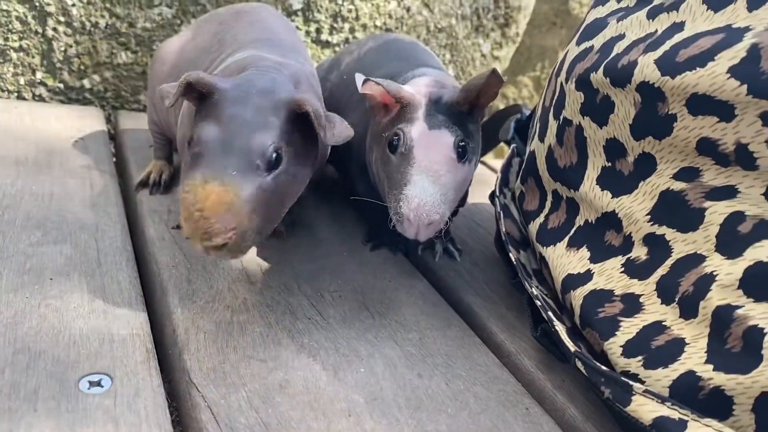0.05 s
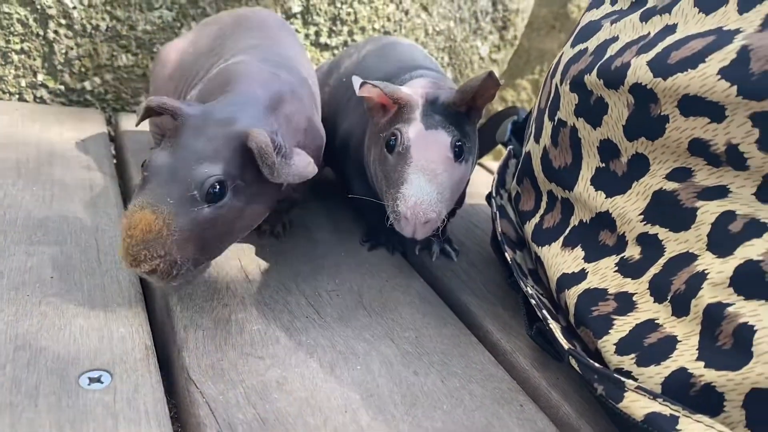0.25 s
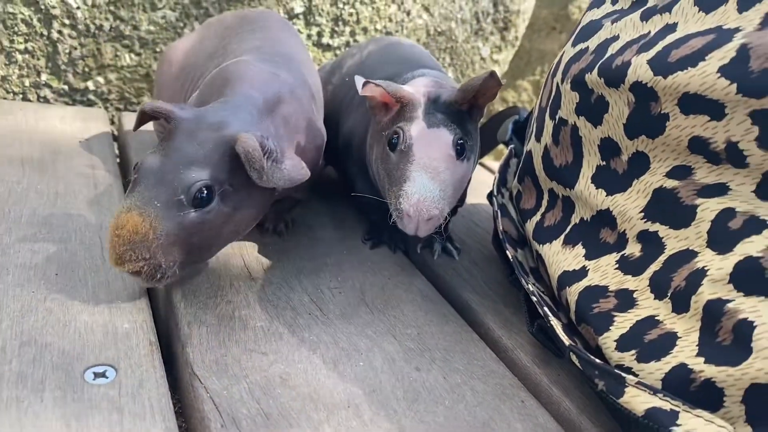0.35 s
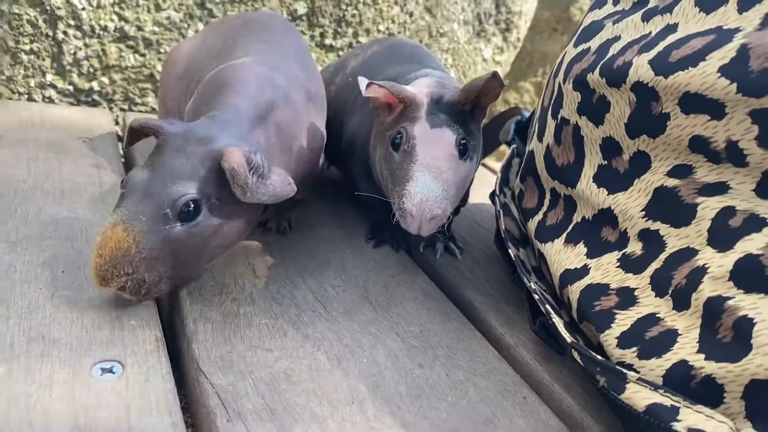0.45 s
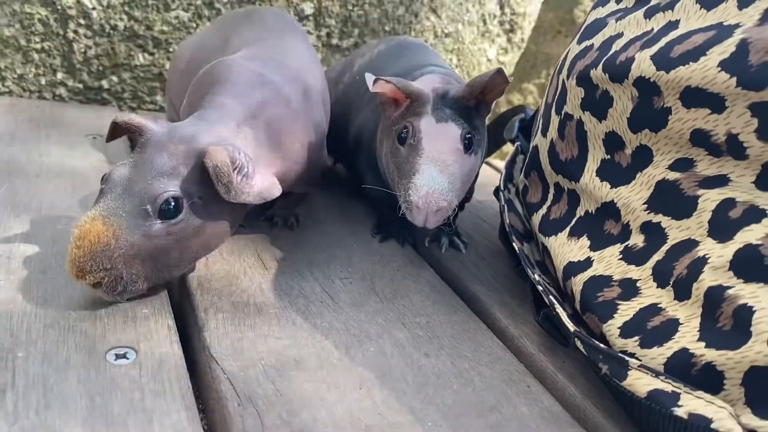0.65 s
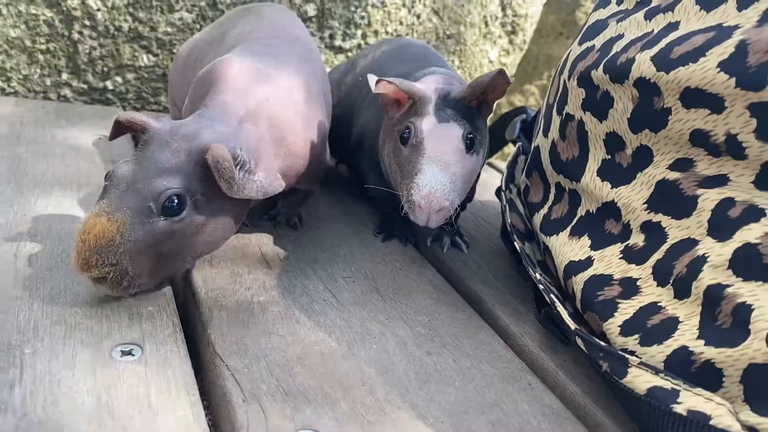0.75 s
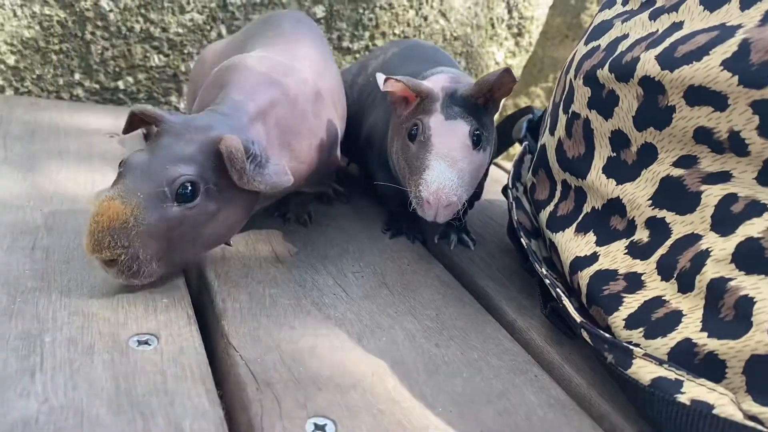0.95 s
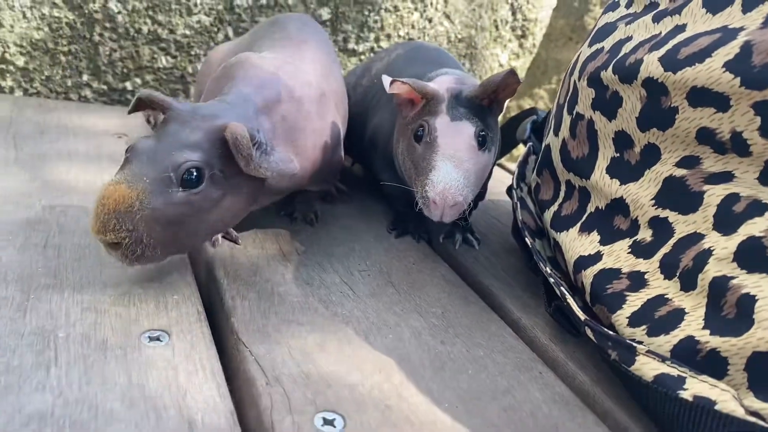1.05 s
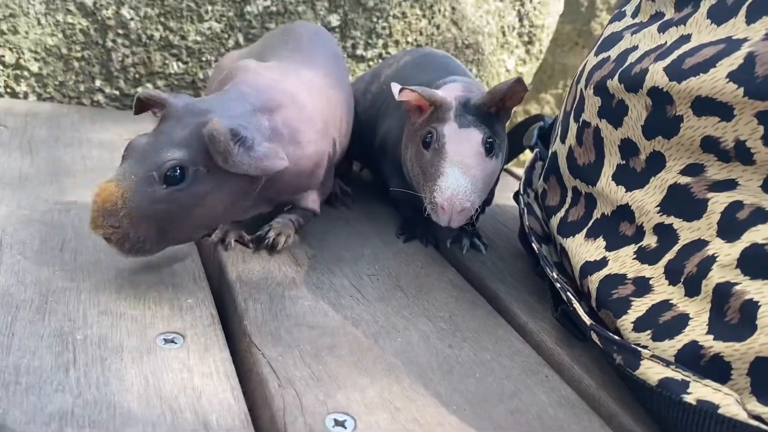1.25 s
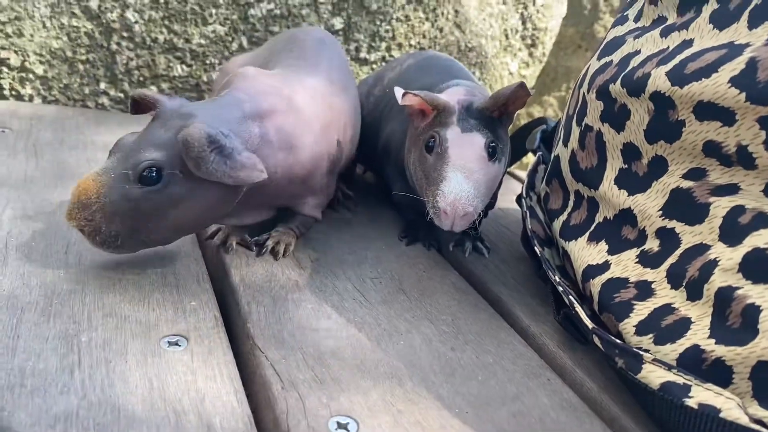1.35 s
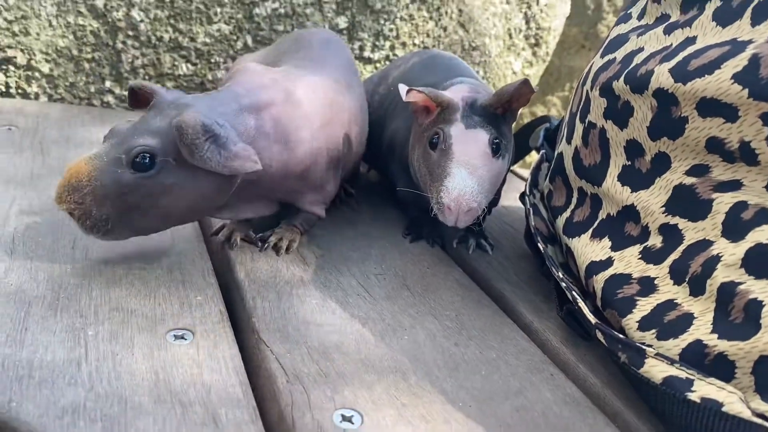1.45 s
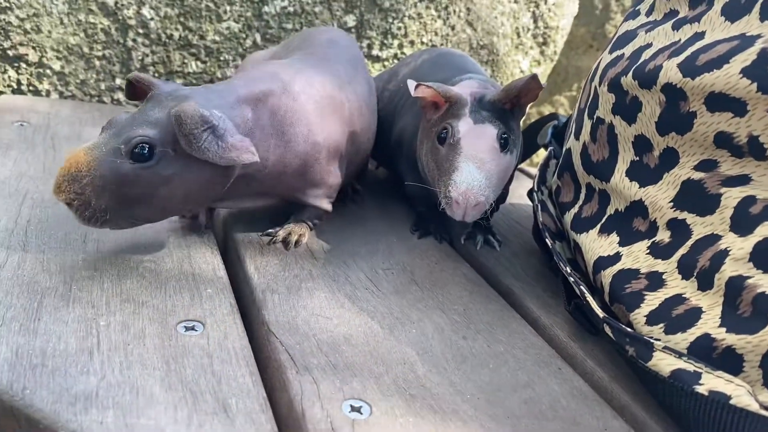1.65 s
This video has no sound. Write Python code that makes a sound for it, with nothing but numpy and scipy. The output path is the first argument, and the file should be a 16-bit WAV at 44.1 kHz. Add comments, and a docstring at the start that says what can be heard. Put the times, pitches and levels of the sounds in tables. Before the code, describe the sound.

A guinea pig whines in short, warbling squeaks, with wind rumbling on the microphone.

```python
"""A guinea pig whines close by: short, warbling squeaks that turn hoarse just before the pitch leaps up.
Its vocal folds buzz, its throat shapes the buzz, and the wooden deck adds a very short echo.
Two gusts of wind rumble and thump on the microphone of a hand-held phone.
A few tiny ticks, soft rustles and a thin high ring sit on a quiet outdoor hiss."""
import sys
import numpy as np
from scipy import signal
from scipy.fft import rfft, irfft
from scipy.io import wavfile
from scipy.ndimage import uniform_filter1d

SR = 44100
rng = np.random.default_rng(int(sys.argv[2]) if len(sys.argv) > 2 else 0)


def digitize_waveform(pressure):
    """Quantize a signal to 16-bit integers and store it at the path in sys.argv[1].

    Rows of a 2-D input are taken as channels; values are limited to [-1, 1].
    """
    field = np.atleast_2d(pressure).T
    bounded = np.clip(field, -1, 1)
    quanta = np.round(bounded * 32767).astype(np.int16)
    wavfile.write(sys.argv[1], SR, quanta)


N = 74970


def guinea_pig():
    """Vocal folds buzz through the throat; when hoarse, their swings alternate strong and weak."""
    # the path of the voice, one list for each whine: (time [s], pitch [Hz], level [dB])
    whines = [
        [(0.015, 488, -51.5), (0.035, 542, -52), (0.053, 549.6, -56), (0.063, 826, -49), (0.071, 1136, -56)],
        [(0.109, 547, -51), (0.12, 602, -46), (0.138, 496.4, -48.5), (0.147, 741, -48), (0.153, 749, -54)],
        [(0.159, 593, -52), (0.165, 726, -41), (0.174, 682, -45), (0.185, 756, -40), (0.194, 609, -44),
         (0.206, 740, -46), (0.211, 1077, -37), (0.217, 1202, -35.5), (0.223, 1056, -43.5), (0.227, 745, -71)],
        [(0.258, 560.4, -49), (0.266, 705, -40.5), (0.279, 684.5, -47.5), (0.292, 1135, -42.5), (0.3, 946, -42),
         (0.313, 789.7, -41.5), (0.321, 547, -45), (0.329, 680, -48), (0.338, 1113, -52)],
        [(0.522, 599.8, -50), (0.528, 726.7, -43), (0.549, 620, -42), (0.558, 1048, -41.5), (0.565, 1132, -45),
         (0.571, 945, -45.5), (0.578, 1129, -36.5), (0.583, 1032, -44), (0.587, 709, -65)],
        [(0.618, 580, -51), (0.626, 740.6, -41.5), (0.636, 721, -45), (0.644, 1109, -45.5),
         (0.651, 1114, -39.5), (0.661, 762.6, -50), (0.668, 650, -44.5), (0.678, 734.8, -43), (0.686, 620, -57)],
        [(0.72, 577, -59), (0.732, 701, -47), (0.74, 684, -50.5), (0.75, 568.4, -49.5), (0.76, 788, -43),
         (0.768, 1208, -61)],
        [(0.817, 514.5, -53.5), (0.825, 503.5, -50.5), (0.833, 437, -56)],
        [(0.909, 737, -46), (0.93, 700, -42), (0.942, 531.8, -44), (0.952, 612, -43), (0.959, 1118, -38),
         (0.965, 1266, -38.5), (0.97, 1102, -43.5), (0.974, 707, -55), (0.983, 578, -44), (0.997, 777.4, -39.5),
         (1.009, 902, -45), (1.024, 790, -40.5), (1.032, 771, -41.5), (1.037, 1149, -41.5), (1.043, 1255, -36),
         (1.052, 819, -43), (1.061, 592.3, -40.5), (1.078, 535.2, -46), (1.09, 596, -39.5), (1.101, 907, -41.5),
         (1.112, 1175, -38.5), (1.122, 783, -41), (1.134, 701, -40), (1.142, 748.6, -41.5), (1.16, 580, -42.5),
         (1.18, 452.5, -51.5), (1.195, 476.2, -45), (1.207, 673.5, -44.5), (1.222, 549, -57),
         (1.238, 800, -53.5)],
        [(1.289, 490, -54), (1.303, 553, -53), (1.322, 442.4, -51.5), (1.332, 589, -53.5)],
        [(1.391, 640, -50), (1.4, 732.3, -41.5), (1.414, 731, -41.5), (1.427, 539, -43), (1.439, 618.6, -44.5),
         (1.446, 1103, -38.5), (1.452, 1299, -38), (1.458, 1080, -49), (1.465, 760.4, -47), (1.476, 594.5, -43),
         (1.488, 547, -42), (1.497, 603, -42.5), (1.507, 814.6, -39), (1.521, 1019, -44.5),
         (1.529, 856.7, -41.5), (1.536, 893.6, -40.5), (1.545, 560.5, -49)],
        [(1.567, 514, -49), (1.577, 637, -44), (1.588, 829, -42.5), (1.598, 1116, -40), (1.609, 782, -48.5),
         (1.622, 872, -41), (1.631, 758.6, -44), (1.638, 501, -52)],
    ]
    # hoarse stretches, where the folds swing unevenly: (start [s], end [s], roughness [0-1])
    hoarse = [(0.197, .209, 0.93), (.27, .3, 0.72), (0.302, .32, 0.13), (0.534, .573, 0.69),
              (0.632, .642, 0.63), (.66, .673, 0.46), (.752, 0.762, 0.29), (0.936, .957, 0.74),
              (1.002, 1.02, 0.76), (1.019, 1.036, 0.22), (1.421, 1.444, 0.59), (1.511, 1.533, 0.72),
              (1.589, 1.622, .35)]
    # how throat and mouth boost or weaken the buzz: (frequency [Hz], gain [dB])
    throat = [(250, -16), (480, -2), (720, 1), (1130, 1.5), (1480, -3), (1700, -8.5), (1850, -15),
              (2080, -25.5), (2260, -10), (2520, -4.5), (2780, -11.5), (2950, -26), (3450, -26),
              (5000, -50)]
    attack_s, release_s, glide_s = 0.0044, 0.0021, 0.0014
    full_voice_db = -40.5
    t = times()
    when, pitch, db = np.array([row for whine in whines for row in whine]).T
    hz = uniform_filter1d(np.interp(t, when, pitch), int(glide_s * SR))
    level_db = np.interp(t, when, db)
    sounding = sum(gate(whine[0][0], whine[-1][0], attack_s, release_s) for whine in whines)
    rough = 0.13 + sum(amount * gate(start, end, attack_s, attack_s) for start, end, amount in hoarse)
    pitch_wobble = (0.01421 + 0.09 * rough) * band_noise(0, 399)
    phase = 2 * np.pi * np.cumsum(hz * (1 + pitch_wobble)) / SR
    # below full voice the overtones fall away faster, so soft whines sound duller
    db_per_octave = -1.5 + 0.43 * np.minimum(level_db - full_voice_db, 0)
    buzz = sum(undb(db_per_octave * np.log2(k)) * np.cos(k * phase) for k in range(1, 9))
    uneven_swing = 0.83 * rough * np.cos(phase / 2 + band_noise(0, 100))  # at half the pitch
    rasp = (0.048 + 0.46 * rough) * band_noise(0, 880)
    voice = colour(buzz * (1 + uneven_swing + rasp), throat)
    # even out the loudness, then give each whine its own rise and fall
    loudness = np.sqrt(uniform_filter1d(voice ** 2, size=330) + 1e-9)
    return voice / loudness * undb(level_db + 1) * sounding


def on_deck(voice):
    """The voice reaches the left and right microphones differently; boards and wall add a short echo."""
    # how much louder the left side is: (frequency [Hz], left minus right [dB])
    balance = [(700, 1), (1200, -0.2), (1600, -0.5), (2400, -4.5), (4000, 1)]
    # how far the wave on the left runs ahead: (frequency [Hz], lead [radians])
    left_lead = [(700, 0.59), (1300, 0.63), (1700, 0.81), (2300, 1.72), (2800, 1.86), (3200, 1.76)]
    echo_db, echo_s = -16, 0.06  # the echo dies away by 60 dB in echo_s
    to_left = undb(on_log(freqs(), balance) / 2) * np.exp(0.5j * on_log(freqs(), left_lead))
    direct = irfft(rfft(voice) * np.array([to_left, 1 / to_left]), N)
    scatter = rng.standard_normal((2, N)) * undb(-60 * times() / echo_s)
    scatter /= np.sqrt(np.sum(scatter ** 2, axis=1, keepdims=True))
    echo = signal.fftconvolve(voice[None], scatter, axes=1)[:, :N]
    return direct + undb(echo_db) * echo


def wind():
    """Swirling air hits the microphone: a deep rumble, quicker buffeting above it and a few thumps."""
    # how the gusts rise and fall: (time [s], rumble level [dB], buffeting level [dB])
    gusts = [(0.0, -60, -77), (0.028, -51.5, -54), (0.17, -58, -62), (0.216, -43.5, -48.5),
             (0.264, -54, -54), (0.35, -45.5, -44.5), (0.382, -35, -54.5), (0.43, -43.5, -41),
             (0.52, -39, -23), (0.59, -29, -34.5), (0.614, -26, -24.5), (0.634, -42, -29),
             (0.652, -29, -39.5), (0.696, -41, -32), (0.738, -31.5, -43), (0.766, -45.5, -57),
             (0.832, -47.5, -56), (0.95, -37, -38.5), (0.994, -35.5, -51), (1.026, -50, -42),
             (1.084, -44.5, -63.5), (1.14, -42.5, -53), (1.182, -57.5, -60), (1.458, -56, -55),
             (1.52, -65, -52.5), (1.7, -61, -60.5)]
    # the tone of the wind: (frequency [Hz], gain [dB])
    wind_tone = [(20, -37), (35, -18), (60, -3.5), (120, -4.5), (230, -5.5), (350, -14.5), (550, -28),
                 (1000, -49.5), (3000, -81)]
    # single swirls that thump the microphone: (time [s], pitch [Hz], peak level [dB])
    swirls = [(0.385, 104.2, -30), (.458, 286.5, -29), (.472, 99.5, -26.5), (.495, 426, -29.5),
              (0.51, 230, -19.5), (.528, 149.7, -21), (.538, 398.4, -28), (.549, 94.8, -23),
              (0.614, 283, -28.5), (.638, 75, -22.5), (0.727, 165.2, -26.5), (.898, 104.3, -31.5),
              (0.952, 92.8, -32.5), (1.019, 121, -34)]
    rumble_top_hz, low_cut_hz, thump_cycles = 101.2, 38, 0.53
    t, f = times(), freqs()
    when, rumble_db, buffet_db = np.array(gusts).T
    shared, side = (unit(colour(rng.standard_normal(N), wind_tone)) for _ in range(2))
    flow = shared + undb(-6.5) * side * np.array([[1], [-1]])  # left and right differ a little
    deep = irfft(rfft(flow) / (1 + (f / rumble_top_hz) ** 6), N)
    rumble = unit(deep) * undb(np.interp(t, when, rumble_db) - 1)
    buffet = unit(flow - deep) * undb(np.interp(t, when, buffet_db) - 2)
    thumps = np.zeros(N)
    for at, hz, db in swirls:
        cycles = (t - at) * hz
        thumps += undb(db) * np.exp(-(cycles / thump_cycles) ** 2) * np.cos(2 * np.pi * cycles)
    return irfft(rfft(rumble + buffet + thumps) / np.sqrt(1 + (low_cut_hz / (f + 1)) ** 6), N)


def ticks():
    """Tiny dry ticks, likely claws on the boards: bursts of noise that die away at once."""
    # the taps: (time [s], peak level [dB])
    taps = [(.566, -51), (.835, -44), (1.198, -48)]
    # the tone of a tick: (frequency [Hz], gain [dB])
    tick_tone = [(1000, -8), (3000, -9), (5000, -7), (7500, 0), (11000, -2), (13500, -6), (15500, 1)]
    decay_s = 0.003
    t = times()
    bursts = sum(undb(db) * (t >= at) * np.exp(-np.abs(t - at) / decay_s) for at, db in taps)
    return bursts * unit(colour(rng.standard_normal(N), tick_tone))


def rustles():
    """Soft puffs of high noise that swell and fade."""
    # the puffs: (middle [s], half-length [s], level [dB], frequency [Hz], width [Hz])
    puffs = [(.617, 0.0045, -58, 4440, 1500), (1.231, .018, -60, 8146, 2511),
             (1.229, .018, -62, 15400, 1204), (1.253, 0.016, -63.5, 3256, 394),
             (1.644, 0.03, -58, 5157, 3470)]
    return sum(undb(db) * np.exp(-((times() - at) / half) ** 2) * band_noise(hz, width)
               for at, half, db, hz, width in puffs)


def high_ring():
    """Three narrow bands of noise make a faint, thin ring near the end."""
    # the notes of the ring: (frequency [Hz], level [dB])
    notes = [(8320, -67), (10020, -71), (15000, -73)]
    ring = sum(undb(db) * band_noise(hz, width_hz=160) for hz, db in notes)
    return ring * gate(start=1.58, end=1.65, attack=0.03, release=0.03)


def outdoor_hiss():
    """A smooth hiss, partly shared by both microphones; its treble dips a little and comes back."""
    # the tone of the hiss: (frequency [Hz], gain [dB])
    hiss_tone = [(30, 4), (70, 2), (200, 1.5), (450, -8.5), (1000, -11.5), (2000, -18), (3100, -16.5),
                 (4000, -19), (5200, -20.5), (7000, -20), (10000, -24.5), (13000, -31), (15500, -25)]
    # how alike left and right are: (frequency [Hz], likeness [0-1])
    likeness = [(100, .85), (1000, .7), (2000, .3), (4000, .15), (7600, .2), (8300, .7), (15000, .85)]
    # how the treble drifts: (time [s], gain [dB])
    treble_drift = [(0, 3), (.3, 3), (.42, 0.5), (.8, 1), (1.4, 0), (1.7, 3)]
    treble_from_hz, delay_from_hz, treble_delay_s = 3300, 2670, 0.000177
    f = freqs()
    alike = on_log(f, likeness)
    shared = rfft(colour(rng.standard_normal(N), hiss_tone)) * np.sqrt(1 + alike)
    side = rfft(colour(rng.standard_normal(N), hiss_tone)) * np.sqrt(1 - alike)
    # the treble reaches the left side slightly later; the bass stays in step
    delay = treble_delay_s / (1 + (delay_from_hz / (f + 1)) ** 6)
    left = (shared + side) * np.exp(-2j * np.pi * f * delay)
    right = shared - side
    hiss = unit(irfft(np.array([left, right]), N)) * undb(-54)
    low = irfft(rfft(hiss) / (1 + (f / treble_from_hz) ** 4), N)
    treble_db = np.interp(times(), *np.array(treble_drift).T)
    return low + (hiss - low) * undb(treble_db)


def undb(db):
    """Turn decibels into a number to multiply by."""
    return 10 ** (np.asarray(db) / 20)


def unit(x):
    """Scale a sound to an average strength (rms) of 1."""
    return x / np.sqrt(np.mean(x ** 2))


def times():
    """The time of every sample, in seconds."""
    return np.arange(N) / SR


def freqs():
    """The frequency of every point in the spectrum, in Hz."""
    return np.arange(N // 2 + 1) * SR / N


def on_log(hz, points):
    """Read between (frequency [Hz], value) points, with the octaves evenly spaced."""
    point_hz, values = np.array(points).T
    return np.interp(np.log(hz + 1), np.log(point_hz), values)


def colour(x, points):
    """Shape the tone of a sound with (frequency [Hz], gain [dB]) points."""
    return irfft(rfft(x) * undb(on_log(freqs(), points)), N)


def band_noise(hz, width_hz):
    """Noise of strength 1 in a bell-shaped band around one frequency."""
    bell = np.exp(-2 * ((freqs() - hz) / width_hz) ** 2)
    return unit(irfft(rfft(rng.standard_normal(N)) * bell, N))


def gate(start, end, attack, release):
    """Fade in before the start, hold, and fade out after the end; all in seconds."""
    t = times()
    ramp = np.minimum((t - start) / attack + 1, (end - t) / release + 1)
    return np.sin(np.pi / 2 * np.clip(ramp, 0, 1)) ** 2


def scene():
    """The animal, the wind and the hiss, plus small sounds made afresh for left and right."""
    mix = on_deck(guinea_pig()) + wind() + outdoor_hiss()
    return mix + np.array([ticks() + rustles() + high_ring() for _ in range(2)])


def record(dry):
    """The phone cuts off the very highest treble."""
    top_hz = 15900
    return signal.sosfilt(signal.ellip(10, 0.2, 70, top_hz, fs=SR, output="sos"), dry)


dry = scene()
out = record(dry)
digitize_waveform(out)
```